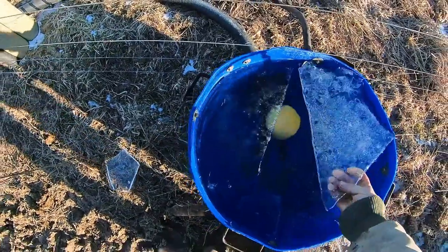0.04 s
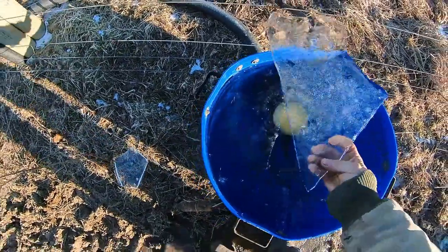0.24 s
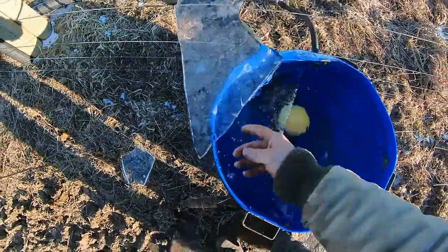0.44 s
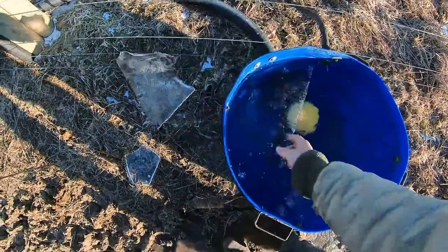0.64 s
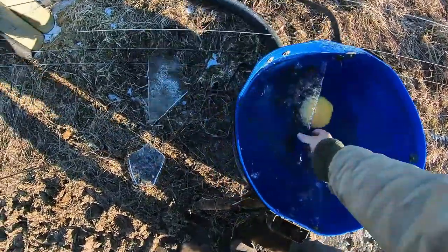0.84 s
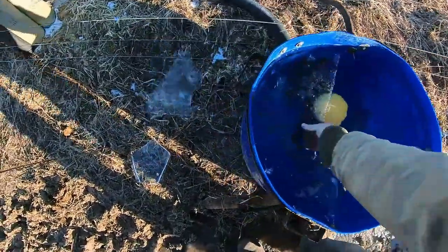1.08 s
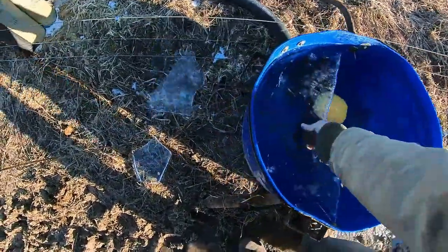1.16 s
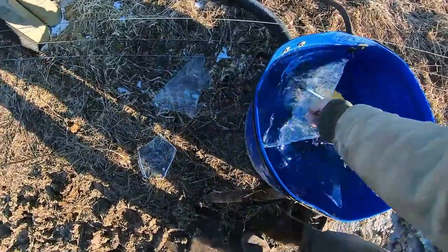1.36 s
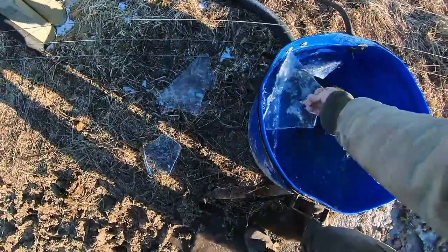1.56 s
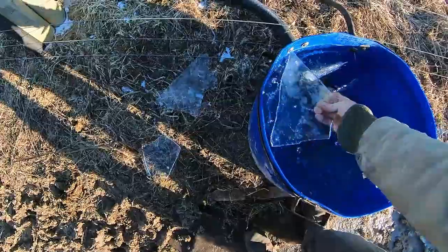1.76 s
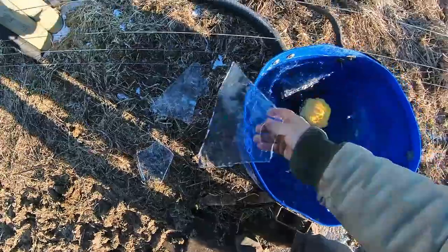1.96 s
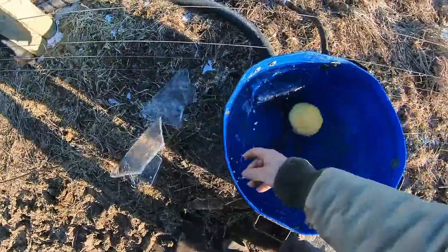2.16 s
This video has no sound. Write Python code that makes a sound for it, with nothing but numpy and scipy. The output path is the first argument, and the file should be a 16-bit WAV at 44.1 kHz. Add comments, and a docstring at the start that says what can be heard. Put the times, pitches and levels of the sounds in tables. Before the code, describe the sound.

Thin ice cracks and snaps as a hand breaks it in a plastic water tank.

```python
"""Thin sheet ice cracks as it is broken by hand in a plastic water tank, outdoors, heard from close above.
Each crack is a run of tiny fractures that excites the modes of the sheet and of the tank; wall and
water thump. Early on, a tossed pane of ice shatters on the ground; the loudest cracks follow.
The freed pane scrapes by stick-slip friction and sloshes out of the water, and the drops and run-off
that fall from it trap bubbles, which ring."""
import sys
import numpy as np
from scipy import signal
from scipy.fft import rfft, irfft
from scipy.io import wavfile

SR = 44100
rng = np.random.default_rng(int(sys.argv[2]) if len(sys.argv) > 2 else 0)


def int16_out(signal):
    """Quantize to a 16-bit WAV file."""
    q = np.round(np.clip(np.atleast_2d(signal).T, -1, 1) * 32767)
    wavfile.write(sys.argv[1], SR, q.astype(np.int16))


N = 98122
TIME = np.arange(N) / SR


def from_db(db):
    """Decibels to amplitude ratio."""
    return 10 ** (np.asarray(db) / 20)

def unit(x):
    """Normalisation to unit energy."""
    return x / np.sqrt(np.sum(x ** 2) + 1e-20)

def add(out, start, x):
    """Superposition of a short sound at a start time [s]."""
    i = max(int(start * SR), 0)
    out[i:i + len(x)] += x[:max(N - i, 0)]

def cut(x, hz, kind, order=2):
    """Butterworth filtering."""
    sos = signal.butter(order, np.clip(hz, 10, .45 * SR), kind, fs=SR, output="sos")
    return signal.sosfilt(sos, x + 1e-18)

def level(rows):
    """Amplitude envelope interpolated through (time [s], level [dB])."""
    return from_db(np.interp(TIME, *np.transpose(rows)))

def coloured(x, spectrum):
    """Spectral shaping of a steady sound, at unit rms."""
    hz, db = np.transpose(spectrum)
    bins_hz = np.maximum(np.arange(N // 2 + 1) * SR / N, 1)
    gain = from_db(np.interp(np.log(bins_hz), np.log(hz), db))
    return unit(irfft(rfft(x) * gain, N)) * np.sqrt(N)

def clicks(size, per_s, spread_db):
    """A Poisson train of impulses with random sign and a spread of sizes."""
    born = rng.random(size) < per_s / SR
    sign = rng.choice([-1, 1], size)
    return born * sign * from_db(spread_db * np.minimum(rng.exponential(1, size), 4))

def ring(x, modes):
    """Modal resonance: x drives damped sinusoids, each level setting the energy of its mode."""
    t = TIME[:SR // 3]
    body = sum((-1) ** k * from_db(db) * unit(np.sin(2 * np.pi * hz * t) * from_db(-60 * t / t60))
               for k, (hz, db, t60) in enumerate(modes))
    return signal.fftconvolve(x, body)[:N]


# spectrum of still outdoor air: (frequency [Hz], relative level [dB])
AIR_SPECTRUM = [(25, 15.5), (70, 12), (200, 10), (500, -0.5), (1500, -19), (6000, -20.5), (9000, -15.5),
                (15000, -16.5)]

def air():
    """Ambient noise: steady and random, strongest in the bass."""
    return from_db(-66) * coloured(rng.standard_normal(N), AIR_SPECTRUM)


# envelope of the rocking water: (time [s], level [dB])
SLOSH_LEVEL = [(0, -52), (.15, -67.5), (.5, -70.5), (.87, -80.5), (.97, -52.5), (1.05, -67), (1.13, -43),
               (1.25, -49.5), (1.36, -45.5), (1.46, -29.5), (1.58, -47.5), (1.74, -38), (1.85, -39),
               (1.98, -57), (2.09, -52.5)]
# its spectrum: (frequency [Hz], relative level [dB])
SLOSH_SPECTRUM = [(40, -21), (90, -31.5), (160, -11), (250, 6), (340, -3), (500, -7.5), (1000, -14),
                  (3000, -34.5)]

def slosh():
    """Amplitude-modulated noise: a low wash swells and fades as water rocks in the tank."""
    return level(SLOSH_LEVEL) * coloured(rng.standard_normal(N), SLOSH_SPECTRUM)


def crunch(pitches=40, t60_cycles=40):
    """Impulse-driven resonators: ice grains and tiny bubbles ring briefly, with hiss of equal energy."""
    out = np.zeros(N)
    grains = clicks(N, per_s=6000, spread_db=4)
    resonator = rng.integers(0, pitches, N)
    for k, hz in enumerate(np.geomspace(500, 7000, pitches)):
        radius, angle = from_db(-60 * hz / (t60_cycles * SR)), 2 * np.pi * hz / SR
        feedback = [1, -2 * radius * np.cos(angle), radius ** 2]
        out += np.sqrt(hz) * unit(signal.lfilter([1, 0, -1], feedback, grains * (resonator == k) + 1e-18))
    return unit(out) + unit(rng.standard_normal(N))

# envelope of grating edges and the water fizzing under them: (time [s], level [dB])
GRATING_LEVEL = [(0, -68), (.07, -66), (.2, -79), (.36, -66), (.45, -77.5), (.64, -74), (.76, -51),
                 (.84, -80), (.95, -50.5), (1.05, -57.5), (1.12, -38.5), (1.23, -58.5), (1.28, -43.5),
                 (1.34, -49), (1.41, -34.5), (1.54, -49.5), (1.61, -53), (1.67, -38), (1.78, -58),
                 (1.89, -53), (1.94, -69.5), (2.05, -72.5)]
# their spectrum: (frequency [Hz], relative level [dB])
GRATING_SPECTRUM = [(300, -10), (600, 4), (1200, 1), (2000, -1), (3200, 5), (5500, 3), (8000, 1),
                    (15000, -8.5)]
# modes of the floating sheet, also rung by cracks: (frequency [Hz], level [dB], decay T60 [s])
SHEET_MODES = [(493, -36, .08), (582, -21.5, .05), (864.4, -17.5, 0.08), (1113, -12.5, 0.059),
               (1130, -35.5, 0.22), (1470, -30, .14), (2350, -24, 0.19)]

def grating(lift_s=1.95, fade_db_per_s=120):
    """Stick-slip friction: edges rub in clumps and drive the sheet's modes until the pane lifts clear."""
    clumps_db = 3 * np.sqrt(N) * unit(cut(rng.standard_normal(N), 60, "low"))
    fade_db = fade_db_per_s * np.maximum(TIME - lift_s, 0)
    rub = level(GRATING_LEVEL) * from_db(clumps_db - fade_db) * coloured(crunch(), GRATING_SPECTRUM)
    return (rub + from_db(2) * ring(rub, SHEET_MODES)) / np.sqrt(2)


def piece(count=24, low_hz=907, high_hz=7450, mean_t60_s=.024):
    """Free vibration: each broken piece of ice rings with scattered modes of its own."""
    t = TIME[:SR // 8]
    place, sign, decay = rng.random((3, count, 1))
    hz = low_hz * (high_hz / low_hz) ** ((np.arange(count)[:, None] + place) / count)
    envelope = from_db(-60 * t / (mean_t60_s * (.5 + decay)))
    modes = np.sign(sign - .5) * np.sqrt(hz) * np.sin(2 * np.pi * hz * t) * envelope
    return unit(np.sum(modes, axis=0))

def fracture(length, snap_db, hz, flex_db, brittle_db, attack_s=.0003, release_s=.00045):
    """Brittle fracture: tiny breaks ring a piece, flex the ice and shed splinters; gives sound, force."""
    t = TIME[:SR // 8]
    opening = 1 - np.exp(-t / attack_s)
    dying = np.exp(-np.maximum(t - length, 0) / (release_s + .18 * length))  # short runs die faster
    breaks = unit(clicks(len(t), per_s=6300, spread_db=0) * opening * dying)
    splinters = unit(clicks(len(t), per_s=2000, spread_db=1.5) * opening * dying)
    first_snap = (t == t[int(attack_s * SR)]) * 2.1 * np.sqrt(release_s / (release_s + length))
    force = unit(breaks + first_snap)
    rung = force + from_db(-8) * unit(signal.fftconvolve(force, piece())[:len(t)])
    narrow = cut(rung, [hz / 1.13, hz * 1.13], "band", order=1)
    snap = from_db(snap_db) * unit(cut(narrow, [hz / 2, hz * 2.46], "band"))
    flex = from_db(flex_db) * unit(cut(rung, [281, 2630], "band", order=3))
    brittle = from_db(brittle_db) * unit(cut(cut(splinters + first_snap, 6500, "high"), 9600, "low"))
    scale = np.sqrt(SR / 100)  # unit energy becomes unit rms over 10 ms
    return scale * (snap + flex + brittle), scale * force

# breaks and ticks in the floating sheet, and last the dull plop of a falling drop:
# (time [s], run length [s], snap level [dB], snap frequency [Hz], flexing level [dB],
# brittle treble level [dB], tank drive [dB])
CRACKS = [(.001, 0.019, -39.5, 2250, -38, -41, -78), (.0172, 0.012, -38, 3140, -38.5, -48, -76),
          (0.047, 0.0085, -77, 2700, -51.5, -54, -61), (0.239, 0.00061, -68.5, 4500, -74, -63, -90),
          (0.273, 0.00089, -62, 6000, -94, -80, -64), (0.306, 0.0028, -61.5, 4600, -80, -74, -90),
          (0.348, 0.015, -57.5, 5300, -78, -79, -86), (.383, 0.0038, -56.5, 5640, -88, -67, -61),
          (0.884, 0.012, -49, 3450, -59, -68, -51), (0.899, 0.026, -38, 3620, -45.5, -41.5, -58),
          (0.9175, 0.0099, -13, 3130, -20, -24, -38.5), (0.9286, 0.0018, -13.5, 4100, -19, -24.5, -26.5),
          (1.074, 0.0056, -33.5, 3730, -34, -33.5, -27.5), (1.079, 0.012, -29, 7460, -32.5, -39.5, -32.5),
          (1.083, 0.0033, -22, 2570, -29.5, -33, -33), (1.1046, 0.0057, -35, 2920, -35.5, -50, -45),
          (1.1376, 0.0016, -29, 2940, -33, -48, -39), (1.288, 0.0054, -23, 4100, -28, -27, -26),
          (1.297, 0.0095, -29.5, 3600, -30.5, -33, -40), (1.383, 0.0028, -31.5, 5360, -49, -31, -34),
          (1.3994, 0.0019, -16, 5420, -24, -20, -24), (1.416, 0.0073, -35, 5930, -56, -33, -40),
          (1.4587, 0.0047, -40, 6500, -33.5, -26, -44), (1.471, 0.025, -40, 4000, -33, -37, -27),
          (1.5051, 0.0016, -32.5, 6430, -44.5, -33.5, -36), (1.532, 0.0019, -39, 3480, -46, -48, -46),
          (1.5565, 0.0045, -31.5, 3650, -30, -42, -34), (1.563, 0.013, -33, 2740, -33.5, -51, -48),
          (1.5853, 0.00049, -45, 5500, -45.5, -39.5, -35), (1.6267, 0.015, -40.5, 3960, -34.5, -43, -51),
          (1.6314, 0.004, -32, 2650, -45, -53, -35.5), (1.647, 0.0022, -35.5, 4530, -36.5, -46, -39),
          (1.684, 0.037, -30, 3600, -29, -45, -25), (1.708, 0.0021, -18.5, 2685, -18, -25, -28.5),
          (1.716, 0.0026, -25, 3680, -26, -41, -31), (1.73, 0.0077, -37.5, 4670, -46, -45, -30.5),
          (1.794, 0.0011, -30, 5630, -32.5, -40, -22.5), (1.805, 0.002, -44.5, 4500, -36, -55, -45),
          (1.9536, 0.00027, -64, 2770, -45.5, -78.5, -43.5)]
# modes of the tank: (frequency [Hz], level [dB], decay T60 [s])
TANK_MODES = [(170, -13.5, 0.1), (229, -11.5, 0.22), (266.7, -7.5, 0.04), (292.8, -3, 0.087),
              (339.5, -9, 0.11), (414, -8.5, 0.0373), (516, -23.5, 0.02)]

def cracks():
    """Impulsive excitation: cracks, and last a drop's plop, ring the floating sheet and shake the tank."""
    ice, shake = np.zeros((2, N))
    for start, *crack, tank_db in CRACKS:
        sound, force = fracture(*crack)
        add(ice, start, sound)
        add(shake, start, from_db(tank_db) * force)
    tank = cut(ring(shake, TANK_MODES), 128, "high", order=3)  # only the ring above about 128 Hz is kept
    return ice + from_db(-10) * ring(ice, SHEET_MODES) + tank


# bubbles trapped by drops: (time [s], level [dB], frequency [Hz], life [s], initial glide [octaves/s])
DROPS = [(0.122, -49, 1513, 0.027, 0.5), (.312, -41, 1295, 0.035, -8), (.345, -46, 1295, 0.047, 6),
         (0.381, -56.5, 1408, 0.07, 2.5), (1.647, -27, 870, .035, 7.5), (1.865, -40.5, 2760, .016, -4),
         (1.954, -24, 700, 0.011, -4), (1.9528, -32, 3345, 0.012, -14), (1.963, -38.5, 2460, 0.012, 24),
         (1.993, -48.5, 1516, 0.025, 27.5), (1.996, -49.5, 3540, 0.016, -1),
         (2.056, -43.5, 1560, 0.027, 6.5), (2.056, -43, 745, 0.061, 39)]

def drops(glide_s=.057, attack_s=.0015):
    """Bubble resonance: each wobbling bubble rings unevenly, glides and is gone as it surfaces."""
    out, t = np.zeros(N), TIME[:SR // 14]
    for start, db, hz, life, glide in DROPS:
        octaves = glide * glide_s * np.tanh(t / glide_s)
        phase = 2 * np.pi * np.cumsum(hz * 2 ** octaves) / SR
        wobble = .18 * np.sqrt(len(t)) * unit(cut(rng.standard_normal(len(t)), 200, "low"))
        envelope = from_db(db - 60 * (t / life) ** 2) * (1 - np.exp(-t / attack_s))
        add(out, start, envelope * (1 + wobble) * np.sin(phase + wobble))
    return out


# modes of the flying pane: (frequency [Hz], level [dB], decay T60 [s])
GRAZE_MODES = [(1560, -3, 0.14), (3740, 3, 0.067), (5840, -2.5, 0.019)]

def graze(start_s=.575, length_s=.035):
    """Frictional excitation: the flying pane grazes something and rings faintly."""
    contact = np.sin(np.pi * np.clip((TIME - start_s) / length_s, 0, 1))
    return from_db(-62) * ring(contact * rng.standard_normal(N), GRAZE_MODES)


# the tossed pane touches down, shatters and settles: (time [s], run length [s], snap level [dB],
# snap frequency [Hz], flexing level [dB], brittle treble level [dB])
LANDING_CRACKS = [(0.6677, 0.0048, -53.5, 2960, -58.5, -78), (0.6885, 0.00037, -21, 2700, -24, -34.5),
                  (0.7041, 0.0042, -34, 3700, -54, -66.5), (.709, 0.0086, -28, 3030, -46, -55.5),
                  (.721, 0.01, -25.5, 3610, -33, -47.5), (0.7342, 0.0042, -22, 3700, -31, -32.5),
                  (0.7493, 0.0026, -28, 3900, -31.5, -31.5)]
# modes of the landed pane: (frequency [Hz], level [dB], decay T60 [s])
LANDED_MODES = [(447, -21.5, 0.27), (878, -29, .08), (1083, -13.5, 0.12), (1588, -7, .07),
                (1950, -9.5, .05)]

def landing():
    """Impact fracture: the tossed pane breaks on the frozen ground and rings briefly."""
    ice = np.zeros(N)
    for start, *crack in LANDING_CRACKS:
        sound, _ = fracture(*crack)
        add(ice, start, sound)
    return ice + from_db(-12.5) * ring(ice, LANDED_MODES)


# thumps as a pane lands or the sheet gives way: (time [s], level [dB], frequency [Hz], decay T60 [s])
THUMPS = [(0.6868, -32.5, 336, 0.077), (0.733, -30, 195.6, 0.068), (0.9294, -6, 188.7, 0.042),
          (0.9298, -16, 297, 0.033), (1.086, -32, 140.6, 0.17), (1.293, -36, 140.5, 0.14),
          (1.3998, -12.5, 227.7, 0.094), (1.432, -36, 105.7, 0.17), (1.7104, -41, 288, 0.073)]

def thumps(attack_s=.003):
    """Damped oscillation: a low swing of water and wall dies away quickly."""
    out, t = np.zeros(N), TIME[:SR // 4]
    for start, db, hz, t60 in THUMPS:
        envelope = from_db(db - 60 * t / t60) * (1 - np.exp(-t / attack_s))
        add(out, start, envelope * np.sin(2 * np.pi * hz * t))
    return out


# envelope of the bubbling as water runs off the lifted pane: (time [s], level [dB])
GURGLE_LEVEL = [(1.3, -84), (1.45, -55), (1.6, -52.5), (1.66, -39), (1.88, -52.5), (2.0, -58.5)]

def gurgle(bubbles_per_s=500, low_hz=600, high_hz=3200, t60_cycles=30):
    """Superposed bubble resonances: a crowd of small bubbles, each rising a little in pitch."""
    out, t = np.zeros(N), TIME[:SR // 20]
    for when, place, faintness in rng.random((int(bubbles_per_s * N / SR), 3)):
        hz = low_hz * (high_hz / low_hz) ** place
        envelope = from_db(-20 * faintness - 60 * t * hz / t60_cycles)
        add(out, when * N / SR, envelope * np.sin(2 * np.pi * hz * t * (1 + 2 * t)))
    running = TIME > GURGLE_LEVEL[0][0]
    return level(GURGLE_LEVEL) * running * unit(out) * np.sqrt(N)


def reflections(x, t60_s=.064, delay_s=.0057):
    """Diffuse reflection: dense, short echoes from the tank wall and the ground."""
    t = TIME[:SR // 4]
    echo = rng.standard_normal(len(t)) * from_db(-60 * t / t60_s) * (t > delay_s)
    return signal.fftconvolve(x, unit(echo))[:N]

def treble(x, edge_hz=2300):
    """Zero-phase filtering: a high-pass run forwards, then backwards, adds no delay."""
    forwards = cut(x, edge_hz, "high", order=4)
    return cut(forwards[::-1], edge_hz, "high", order=4)[::-1]

def scene():
    """Mid-side stereo: ice and water sit in the centre; treble in quadrature adds a little width."""
    close = landing() + cracks() + drops()
    bed = slosh() + air()
    mid = close + from_db(-19) * reflections(close) + thumps() + graze() + grating() + gurgle() + bed
    side = from_db(-22) * np.imag(signal.hilbert(treble(mid), 2 * N)[:N])
    return np.array([mid + side, mid - side])

def record(dry, ceiling=1.05, edge_hz=6670):
    """Band limiting and saturation: the microphone loses deep bass and high treble and rounds peaks."""
    rounded = ceiling * np.tanh(cut(dry, 80, "high", order=3) / ceiling)
    passband = cut(rounded, edge_hz, "low", order=12)
    faint_top = from_db(-20.5) * cut(cut(rounded, edge_hz, "high", order=4), 9080, "low", order=3)
    return cut(passband + faint_top, 15500, "low", order=16)


dry = scene()
out = record(dry)
int16_out(out)
```